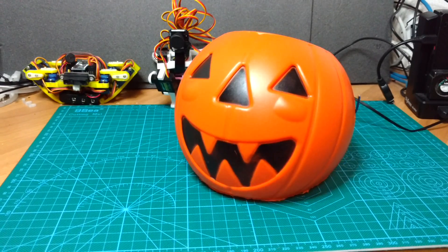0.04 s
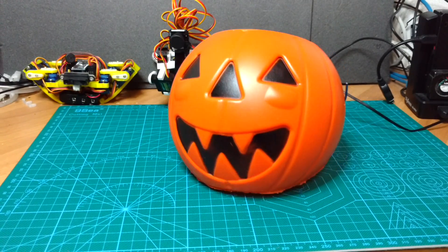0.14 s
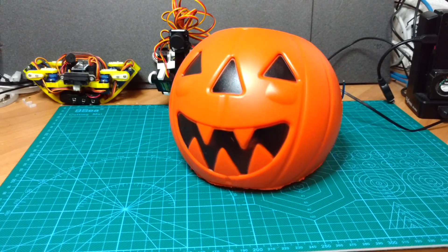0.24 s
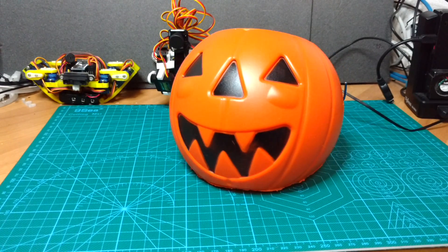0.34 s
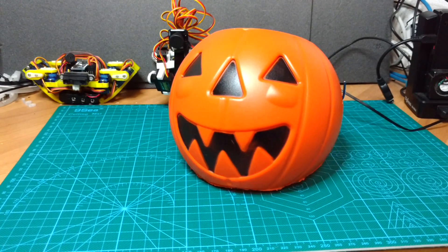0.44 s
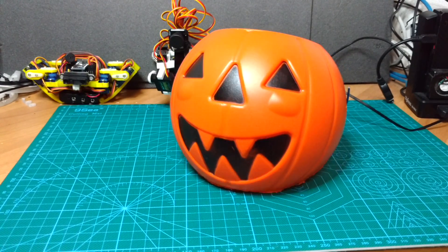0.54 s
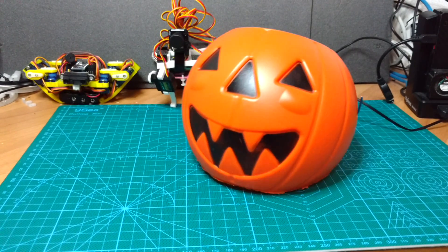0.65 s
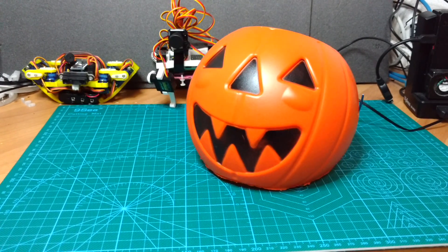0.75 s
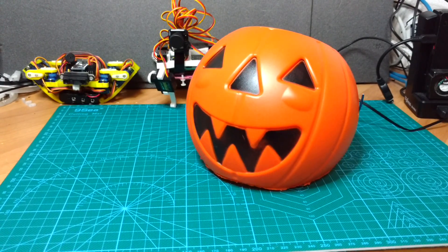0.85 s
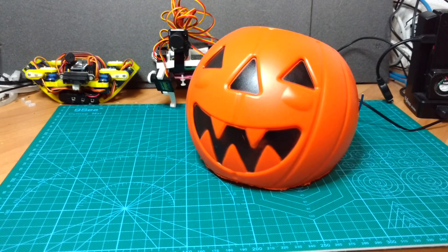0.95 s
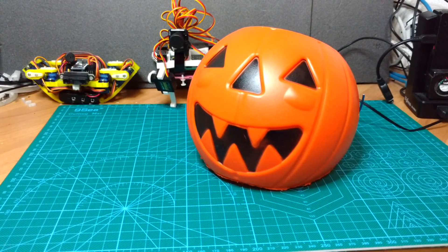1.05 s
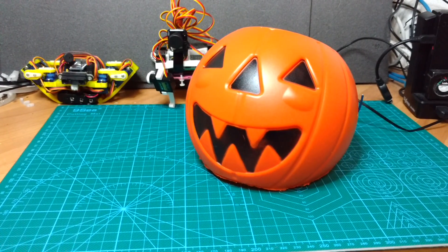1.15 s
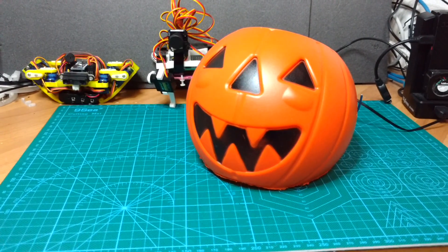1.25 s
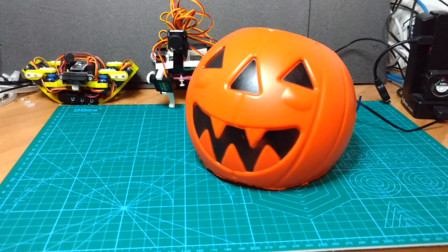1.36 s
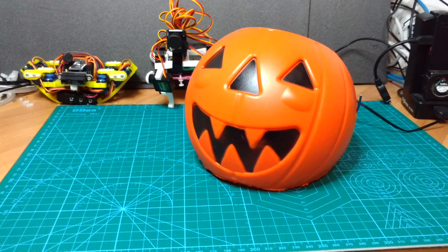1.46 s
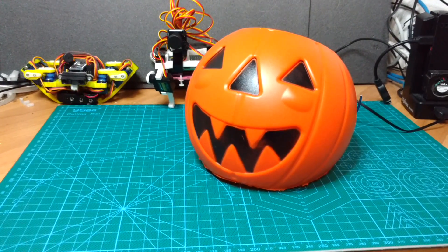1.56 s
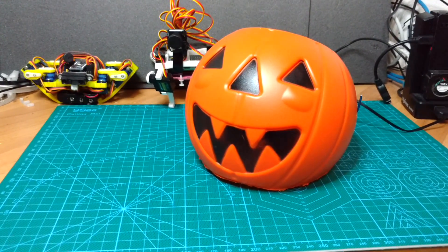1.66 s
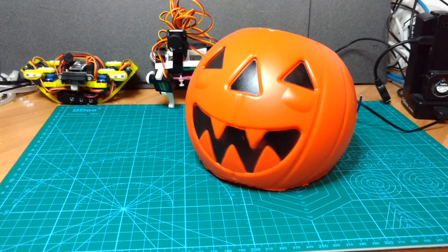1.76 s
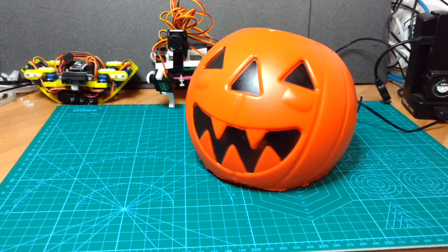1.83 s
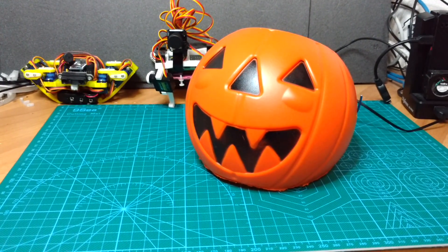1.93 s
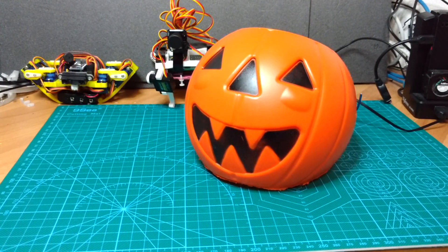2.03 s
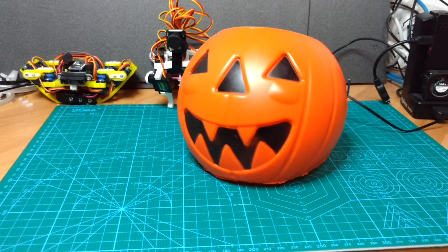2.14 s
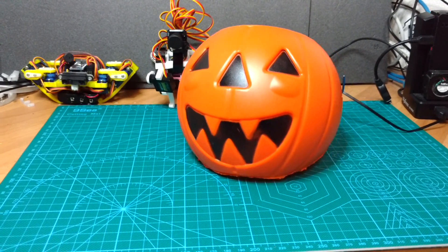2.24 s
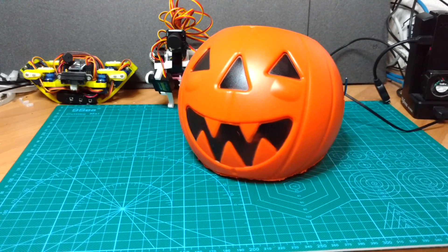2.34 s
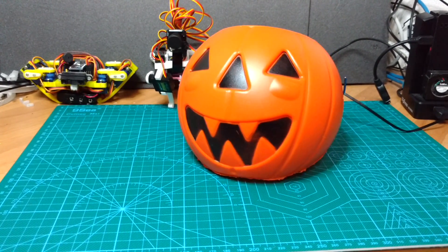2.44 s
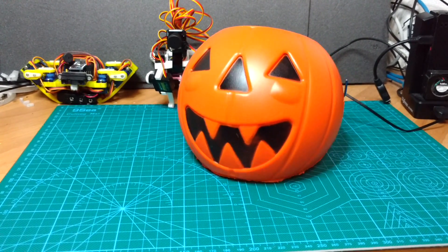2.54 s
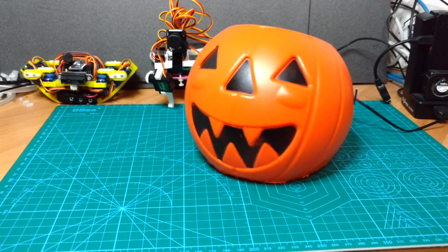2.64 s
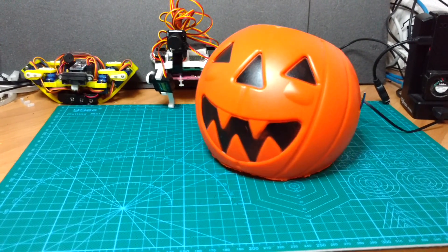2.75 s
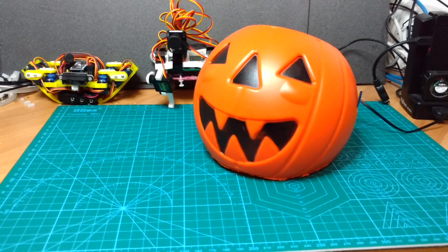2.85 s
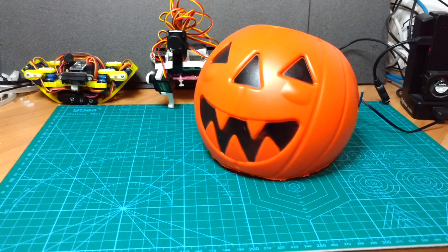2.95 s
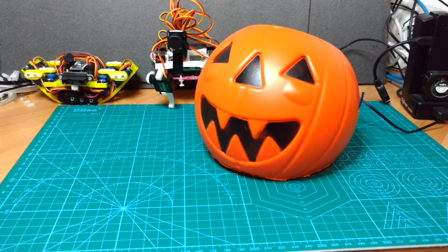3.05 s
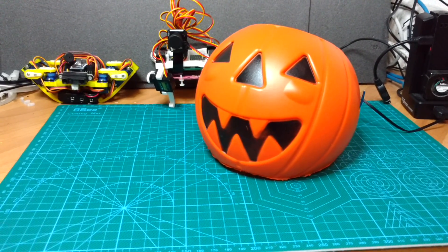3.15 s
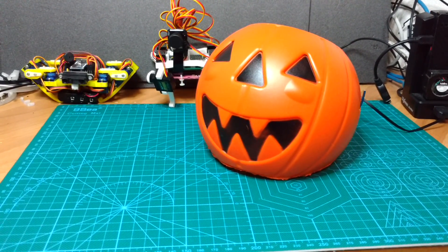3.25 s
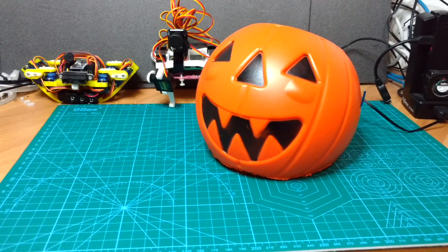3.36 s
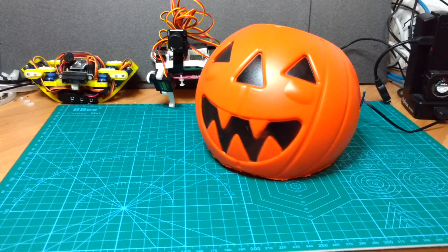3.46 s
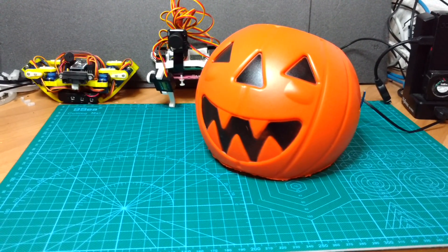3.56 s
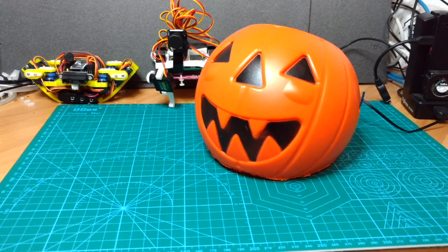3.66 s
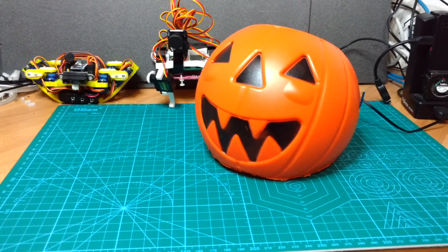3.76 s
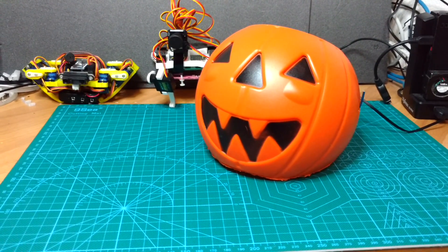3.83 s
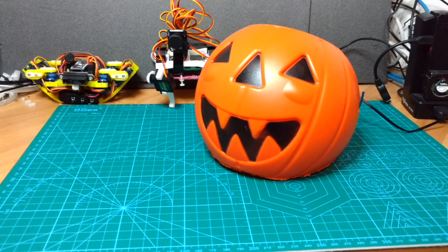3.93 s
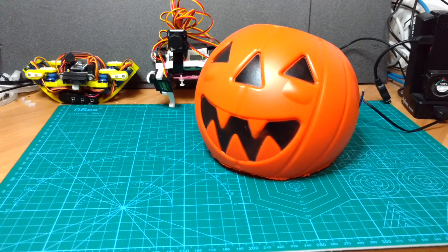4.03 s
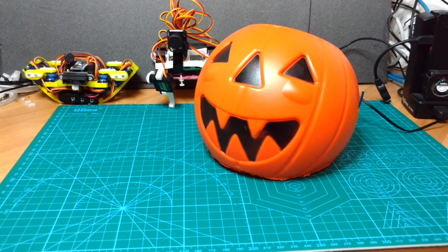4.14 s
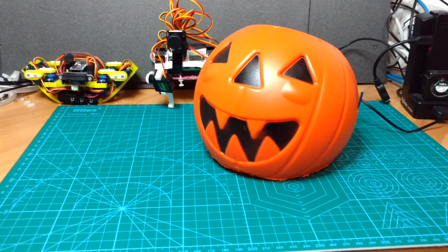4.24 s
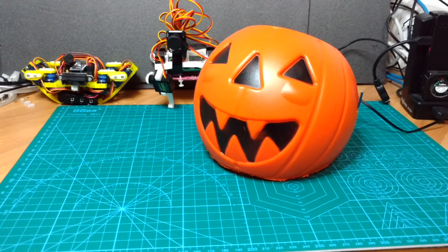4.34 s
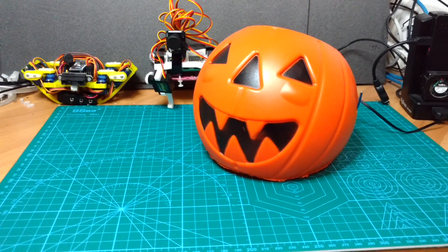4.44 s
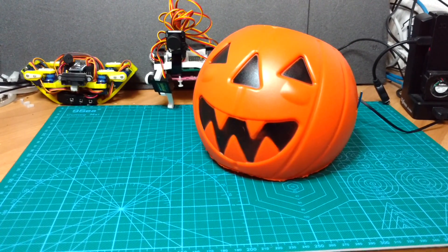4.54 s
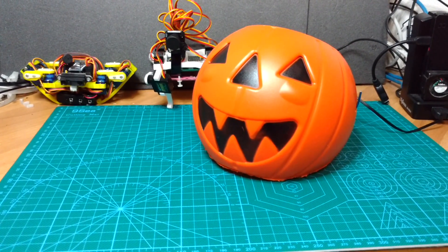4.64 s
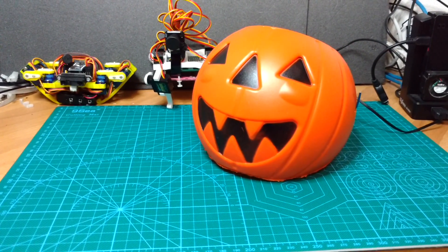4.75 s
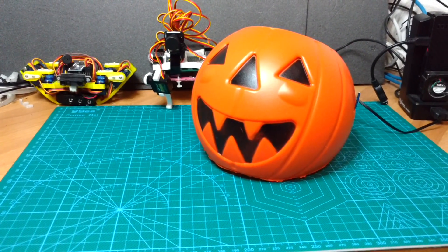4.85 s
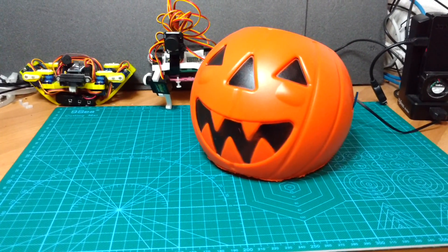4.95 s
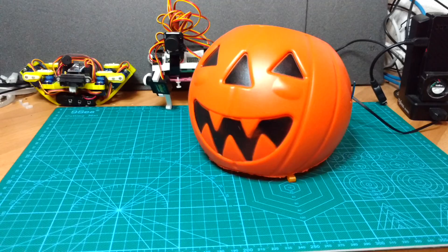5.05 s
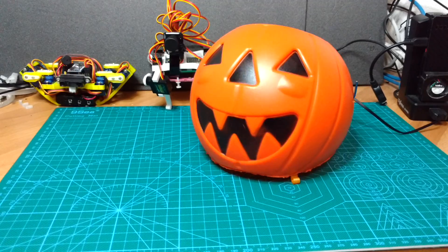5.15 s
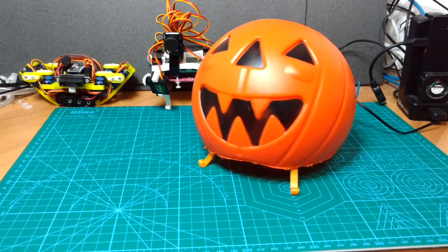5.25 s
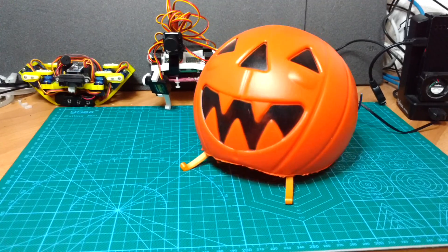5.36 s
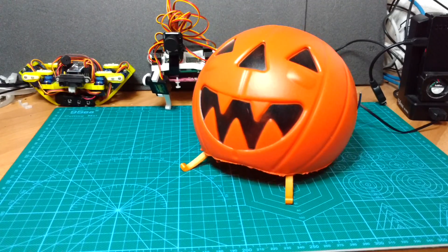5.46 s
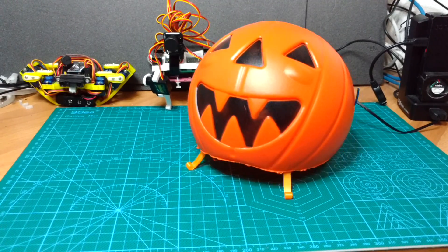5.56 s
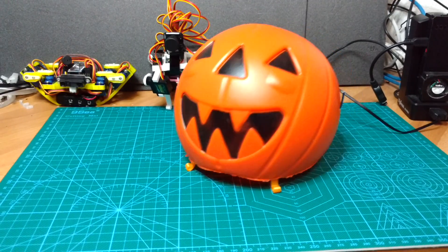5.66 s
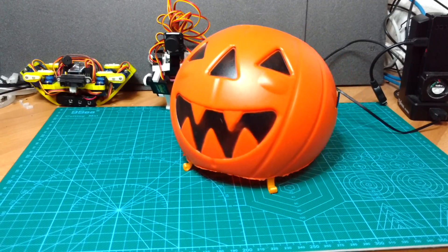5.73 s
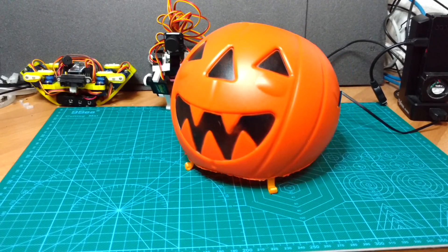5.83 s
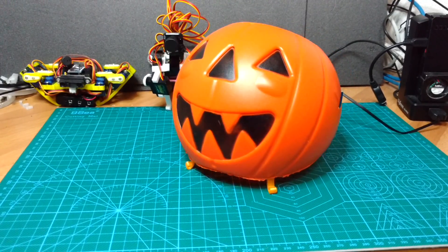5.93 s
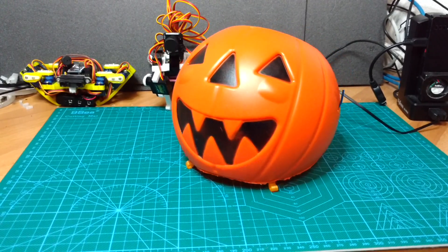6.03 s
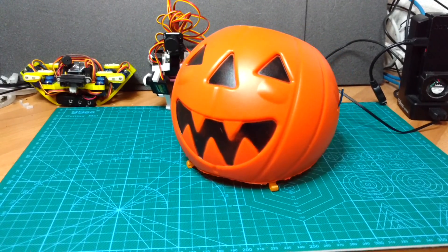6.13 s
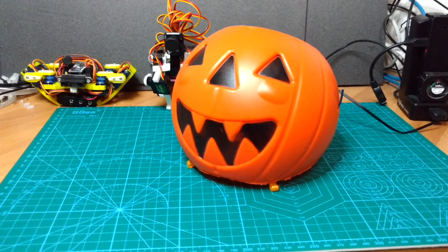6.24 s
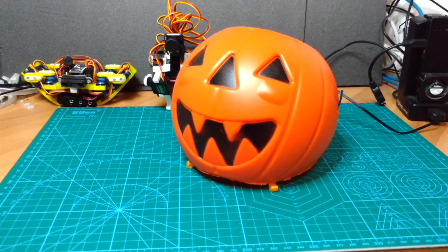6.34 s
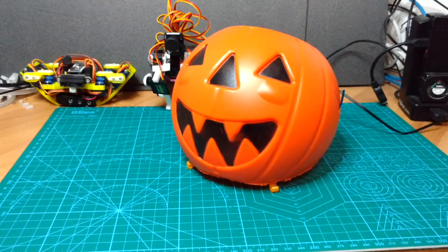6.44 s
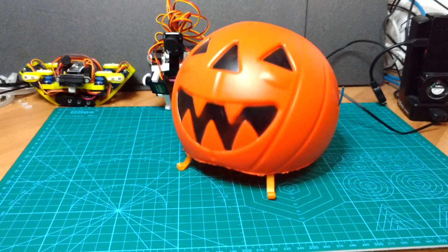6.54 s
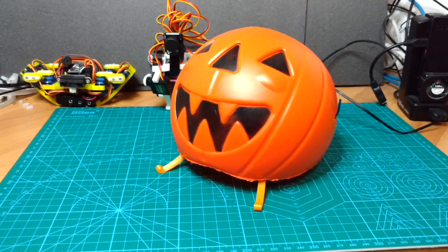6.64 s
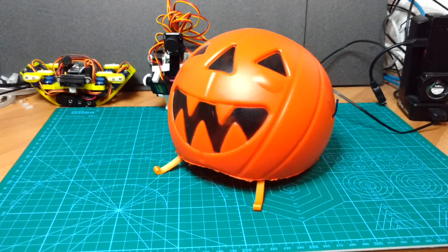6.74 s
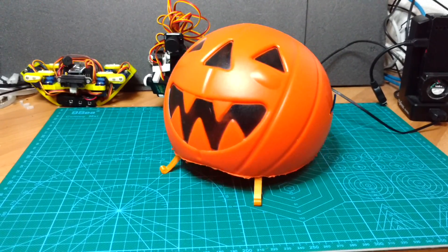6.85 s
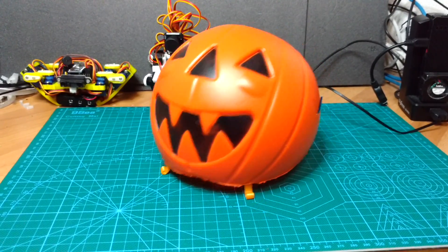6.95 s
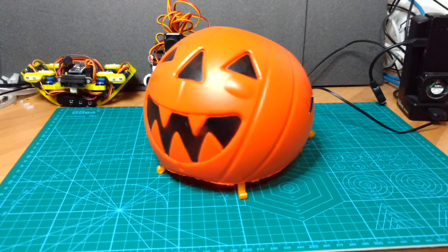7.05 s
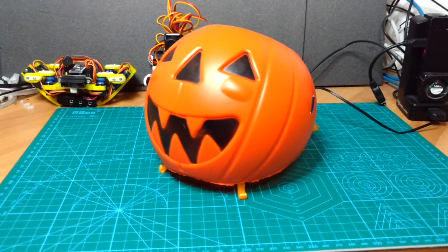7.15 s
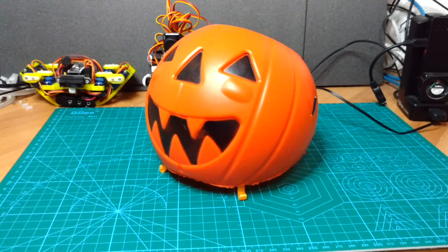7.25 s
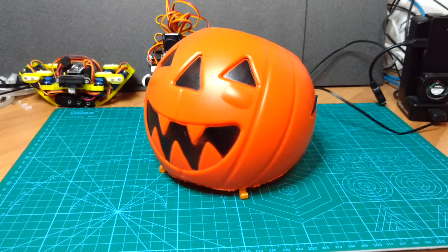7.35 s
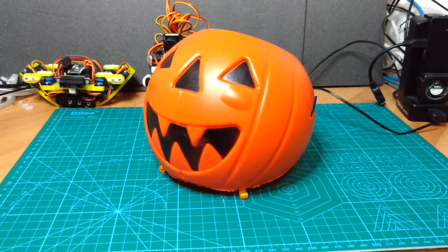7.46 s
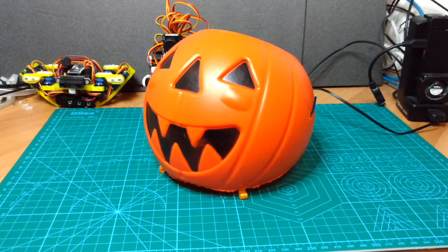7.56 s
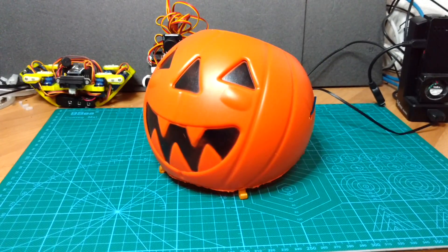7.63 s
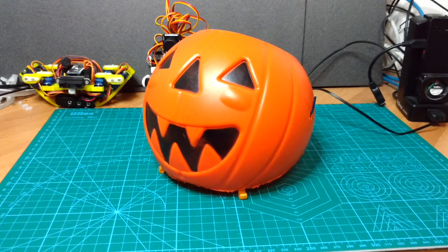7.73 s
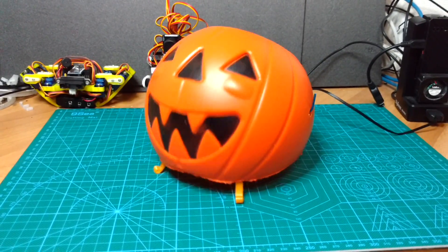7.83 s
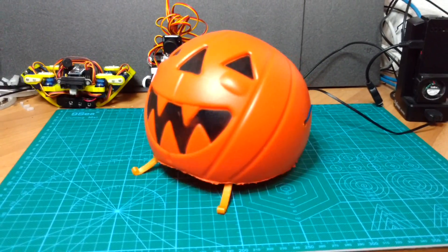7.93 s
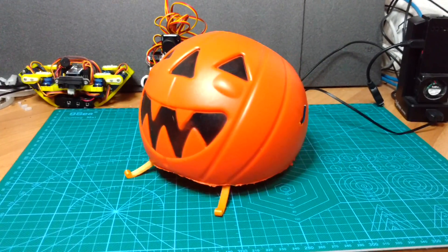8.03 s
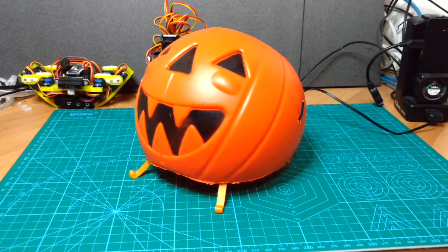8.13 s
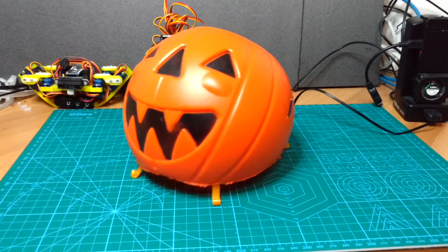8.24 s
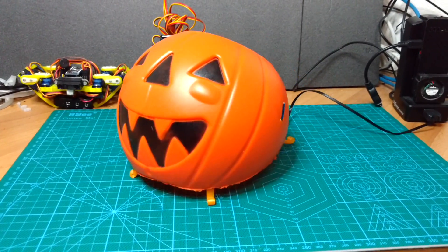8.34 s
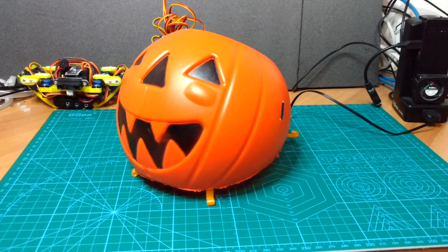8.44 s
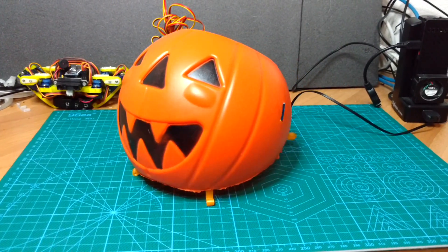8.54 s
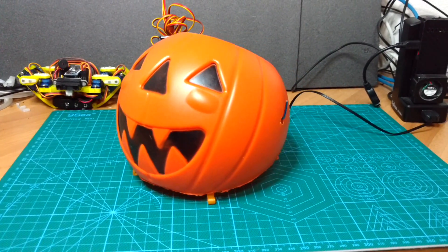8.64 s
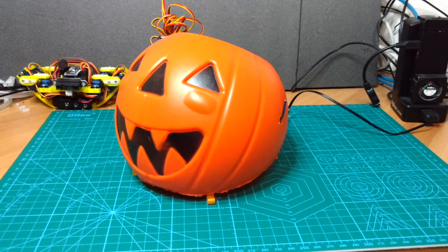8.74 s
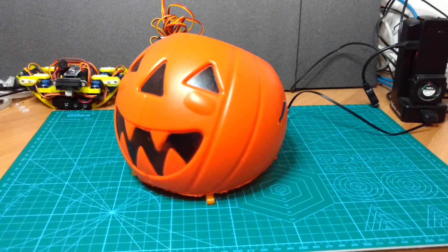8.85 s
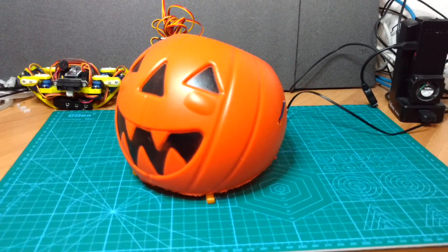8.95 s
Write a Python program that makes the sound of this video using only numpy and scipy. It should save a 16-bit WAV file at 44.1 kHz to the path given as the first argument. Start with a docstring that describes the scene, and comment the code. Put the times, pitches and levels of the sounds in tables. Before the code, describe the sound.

A small legged robot under a hollow plastic pumpkin shell whirs, knocks and squeaks in short servo bursts on a workbench.

```python
"""Small walking robot on a workbench

A four-legged robot under a hollow plastic pumpkin shell moves in bursts: servo gears whir as shaped
noise flecked with short random rings, shell and bench shake as filtered impacts, held poses buzz at 50 Hz.
Feet squeak by stick-slip and knock; shell, frame or bench resonances judder; gearboxes tick and chirp.
Two close microphone ports hear it over a faint hiss."""
import sys
import numpy as np
from scipy import signal
from scipy.fft import rfft, irfft, next_fast_len
from scipy.io import wavfile
from scipy.ndimage import uniform_filter1d

SR = 44100
rng = np.random.default_rng(int(sys.argv[2]) if len(sys.argv) > 2 else 0)


def unload_wav(signal):
    """Save mono or channel-first audio to the path in sys.argv[1] as 16-bit WAV at rate SR, clipped to [-1, 1]."""
    wavfile.write(
        sys.argv[1],
        SR,
        np.round(np.clip(np.atleast_2d(signal).T, -1, 1) * 32767).astype(np.int16),
    )


N = 396459
TIME, FREQ = np.arange(N) / SR, np.fft.rfftfreq(8192, 1 / SR)
CONTROL_HZ = 50  # servo pulse rate

# servo moves, levels relative: start_s, spin_up_s, drive_s, whir_db, change_over_drive_db,
# initial_run_down_db_per_s, rattle_db, rumble_db, growl_re_whir_db
MOVES = [(0.014, 0.037, 0.1, -30.5, 1.5, 86, -33, -36.5, -11),
         (0.493, 0.021, 0.12, -31, -3.5, 60, -35.5, -35.5, -10),
         (2.035, 0.03, 0.088, -32.5, 1.5, 59.5, -37, -39.5, -4.5),
         (2.535, 0.026, .138, -33, -1, 69, -39.5, -35.5, -4.5),
         (4.948, 0.032, .15, -35, 2.5, 175, -33.5, -42, -3),
         (5.195, 0.049, 0.24, -29, 0.5, 450, -29.5, -40.5, -1.5),
         (5.452, 0.025, 0.3, -28, 2, 249.5, -38.5, -49, -1),
         (5.8, 0.021, 0.059, -39, -1, 125, -34, -41, -3),
         (5.95, 0.014, 0.16, -34.5, 4, 310, -41, -49.5, -4.5),
         (6.5, 0.031, 0.23, -25, -8, 369, -27.5, -41.5, -2.5),
         (6.752, 0.034, 0.29, -28, 2.5, 175, -37.5, -51, 1),
         (7.13, 0.022, 0.039, -39, 1.5, 100, -34.5, -41.5, 0),
         (7.251, 0.033, .17, -32, 2, 290, -36, -45, -14),
         (7.808, 0.018, 0.21, -27, -3, 230.5, -25.5, -37.5, 1),
         (8.053, 0.02, 0.31, -28, 2, 231, -34, -47.5, -1.5),
         (8.415, 0.013, 0.036, -36.5, 0, 89.5, -32.5, -41, 2.5),
         (8.555, 0.017, 0.044, -31.5, -1, 279.5, -24.5, -43, -4),
         (8.622, 0.017, 0.1, -28.5, -3, 302, -41.5, -44, -11)]
# gear teeth snapping over as a servo corrects itself, levels relative:
# contact_s, body_db, treble_db, t60_s, leg_ring_hz, case_ring_hz
TICKS = [(1.018, -46, -46, 0.08, 1000, 6040), (1.555, -30.5, -39, 0.094, 1470, 6700),
         (1.736, -35, -43, 0.021, 1050, 3500), (1.908, -27, -48, 0.037, 974, 3150),
         (2.004, -28, -20.5, 0.024, 1020, 3900), (3.346, -36.5, -39, 0.039, 900, 3370),
         (3.383, -35.5, -42, 0.09, 850, 3540), (3.549, -31.5, -43.5, 0.091, 1510, 2870),
         (3.586, -38, -55, 0.12, 890, 3500), (3.665, -40, -49, 0.35, 980, 3900),
         (3.75, -25.5, -29.5, 0.063, 1006, 3000), (3.819, -38, -50, 0.04, 920, 3500),
         (3.834, -32, -39.5, 0.13, 780, 5930), (3.901, -32, -44, 0.06, 770, 3740),
         (3.908, -31, -46, 0.061, 825, 3670), (3.97, -38, -50, 0.23, 790, 3400),
         (4.069, -29.5, -41.5, 0.09, 1055, 3270), (4.152, -38.5, -47, 0.12, 1110, 3630),
         (4.24, -40, -51, 0.26, 1190, 3500), (4.329, -36, -44, 0.078, 895, 3560),
         (4.34, -34, -34, 0.058, 670, 3700), (4.345, -26, -32, 0.072, 1065, 2920),
         (4.866, -37, -60, 0.044, 1011, 3400), (4.903, -41, -40, 0.02, 998, 3500),
         (4.911, -33, -27, 0.042, 994, 3450), (6.256, -46.5, -33, 0.14, 984, 5980),
         (7.558, -45, -33, 0.16, 891.3, 6198), (7.58, -36.5, -50, 0.048, 800, 3480),
         (7.598, -42, -52, 0.044, 680, 3500), (8.863, -59, -32.5, 0.13, 903.4, 6503)]
# gear-train noise colour: freq_hz, density_db (per Hz)
GEARS = [(40, -31.8), (95, -17), (140, -10.1), (400, -8.2), (750, -3.2), (1500, -4.0), (2000, -5),
         (2350, -10), (2900, -1), (3500, -2.8), (4000, -1), (4600, -1.6), (5500, .3), (6200, -.3),
         (7000, -1), (8500, -3.3), (11000, -8.5), (13000, -11), (15000, -16.5)]


def amp(db):
    """Decibels to amplitude."""
    return 10 ** (np.asarray(db) / 20)


def evened(x):
    """Scale to unit RMS."""
    return x / np.sqrt(np.mean(x ** 2) + 1e-20)


def read(points, hz):
    """Interpolate a spectrum linearly on a log-frequency axis."""
    f, value = np.transpose(points)
    return np.interp(np.log(hz + 1), np.log(f + 1), value)


def add(mix, s, sound):
    """Add a sound at s seconds, clipped at the end of the mix."""
    part = mix[..., max(round(s * SR), 0):][..., :sound.shape[-1]]
    part += sound[..., :part.shape[-1]]


def wander(hz, size=N):
    """Random drift of about unit RMS, low-passed near hz."""
    n = next_fast_len(max(size, SR))
    lowpass = 1 + (np.fft.rfftfreq(n, 1 / SR) / hz) ** 4
    return evened(irfft(rfft(rng.standard_normal(n)) / lowpass, n))[:size]


def colour(x, gain):
    """Causal minimum-phase filter of unit energy, shaped by gain over FREQ."""
    log_gain = np.log(np.maximum(gain / gain.max(), 1e-5))
    circle = np.concatenate([log_gain, log_gain[-2:0:-1]])
    ring = np.fft.ifft(np.exp(np.conj(signal.hilbert(circle)))).real[:len(FREQ)]
    return signal.oaconvolve(x, ring[None] / np.linalg.norm(ring), axes=1)[:, :N]


def resonances(modes):
    """Power-summed gain of (hz, width_hz, db) modes."""
    power = 0
    for hz, width_hz, db in modes:
        detune = (FREQ ** 2 - hz ** 2) / (width_hz * (FREQ + 1))
        power = power + amp(db) ** 2 / (1 + detune ** 2)
    return np.sqrt(power)


def resonate(x, hz, width_hz):
    """One resonance of peak gain 1."""
    return signal.lfilter(*signal.iirpeak(hz, hz / width_hz, fs=SR), x)


def shell_gain(width_hz=42):
    """Hollow shell: band-limited modes on a broad skirt."""
    # shell modes: freq_hz, gain_db
    shell_modes = [(459, -2), (516, -39), (588, 7), (732, 0.5), (961, 0.5), (1033, 1.5), (1177, 3.5),
                   (1335, 7), (1378, 0), (1478, 8.5), (1636, 3), (1693, 7.5), (1866, 7), (1995, 1.5),
                   (2095, -23), (2268, -51.5)]
    # broad response between modes: freq_hz, gain_db
    skirt = [(60, -57), (250, -7), (400, -16.5), (800, 4.5), (1500, -1), (2200, -3), (3500, -37), (5000, 4),
             (12000, -38)]
    band = 1 / np.sqrt((1 + (FREQ / 2600) ** 6) * (1 + (300 / (FREQ + 1)) ** 6))
    modes = resonances([(hz, width_hz, db) for hz, db in shell_modes])
    return np.hypot(band * modes, amp(read(skirt, FREQ)))


def bench_gain():
    """Low bench modes, rolled off above and below."""
    # bench modes under the feet: freq_hz, width_hz, gain_db
    bench_modes = [(141.4, 13.6, 0.5), (189, 40, -6), (253.3, 13.3, 4), (297, 13, -5.5), (424, 240, -6)]
    roll_off = np.sqrt((1 + (FREQ / 520) ** 6) * (1 + (122 / (FREQ + 1)) ** 10))
    return resonances(bench_modes) / roll_off


def impacts(per_s, spread_db):
    """Random tiny stereo impacts of uneven size, unit RMS."""
    size = amp(spread_db * np.minimum(rng.exponential(1, N), 4)) * (rng.random(N) < per_s / SR)
    return evened(size * rng.standard_normal((2, N)))


def blows(rows, axis, soft_db, lead_s=.0005, tint=None):
    """Brief scrape, sharp contact, dying spray of bounces; axis picks the level column, tint colours."""
    out, t = np.zeros((2, N)), TIME[:SR // 5] - 1 / 50  # contact at t = 0
    for row in rows:
        contact_s, level_db, t60_s = row[0], row[axis], max(row[3], .005)
        fall = amp(soft_db - 60 * abs(t) / t60_s) + np.exp(-abs(t) / 0.00066)
        envelope = np.where(t < 0, 1.1 * np.exp(-abs(t) / lead_s), fall)
        spray = rng.standard_normal((2, len(t))) * envelope
        short_power = uniform_filter1d((spray ** 2).mean(0), size=176)
        spray = spray / np.sqrt(short_power.max())
        add(out, contact_s + t[0], amp(level_db) * (tint(spray, row) if tint else spray))
    return out


def move_level(axis, lag_s=0, arch_db=0, settle=1, slack_s=0, stall_s=0.1):
    """Spin-up after slack, arched drive, accelerating run-down; axis picks the level column."""
    power, t = np.zeros(N), TIME[:SR]
    for row in MOVES:
        start_s, rise_s, drive_s, _, change_db, fall_db_per_s = row[:6]
        done, coast_s = np.minimum(t / drive_s, 1), np.maximum(t - drive_s, 0)
        arch = arch_db * (2 * done - 1) ** 2
        fall = settle * fall_db_per_s * coast_s * (1 + coast_s / stall_s)
        db = row[axis] + change_db * done - arch - fall
        rise = np.clip((t - slack_s) / (rise_s + lag_s), 0, 1)
        add(power, start_s, (amp(np.maximum(db, -200)) * rise) ** 2)
    return np.sqrt(power)


def whir_level():
    """Gear drive level."""
    return move_level(axis=3)


def shifting(x, depth_db, patch_hz, patch_s):
    """Random patches of the spectrum swell and fade."""
    hz, t, z = signal.stft(x, SR, nperseg=512)
    field = rng.standard_normal(z.shape[:0:-1]).T
    bins, frames = max(round(patch_hz / hz[1]), 1), max(round(patch_s / t[1]), 1)
    for _ in range(2):
        field = uniform_filter1d(field, bins, axis=0)
        field = uniform_filter1d(field, frames, axis=1)
    gain = evened(amp(depth_db * evened(field)))
    return signal.istft(z * gain, SR, nperseg=512)[1][:, :N]


def hiss(level_db=-51.0, waver_db=-1.5):
    """Background hiss: coloured noise with a slight random waver."""
    # hiss colour: freq_hz, gain_db
    hiss_colour = [(25, 2), (70, 3.5), (140, 4.5), (400, 0.5), (900, -1), (1300, 1.5), (1800, -4.5),
                   (2400, 6), (3800, 1.5), (5100, -6), (6200, -8.5), (7200, -4), (8600, -14), (11000, -12),
                   (15000, -25)]
    gain = amp(read(hiss_colour, FREQ)) / np.hypot(1, (55 / (FREQ + 1)) ** 2)
    return amp(level_db + waver_db * wander(25)) * colour(rng.standard_normal((2, N)), gain)


def holding(buzz_db=-1, hum_db=0, fizz_db=-5, uneven_db=1.6):
    """Control pulses kick a stalled motor, ringing frame, bench and gear case, with scraping fizz."""
    # loaded servos holding a pose, levels relative: start_s, end_s, buzz_db, hum_db, case_ring_db
    holds = [(0.364, 0.488, -64, -65.5, -68), (0.8, 1.011, -58, -63.5, -72),
             (2.306, 2.518, -63.5, -66, -62), (2.817, 3.05, -57, -60.5, -72), (3.08, 3.094, -55, -73, -68),
             (6.147, 6.297, -58.5, -63, -74), (6.31, 6.51, -56, -75, -68), (7.45, 7.8, -65, -66, -68),
             (8.75, 8.99, -66, -66.5, -72)]
    buzz, hum, ring = (np.zeros((2, N)) for _ in range(3))
    for start_s, end_s, frame_db, bench_db, case_db in holds:
        for s in np.arange(start_s, end_s, 1 / CONTROL_HZ):
            kick = np.sqrt(SR / CONTROL_HZ) * amp(uneven_db * rng.standard_normal(1))
            add(buzz, s, amp(frame_db) * kick)
            add(hum, s, amp(bench_db) * kick)
            add(ring, s, amp(case_db) * kick)
    frame = colour(buzz, resonances([(1001, 91, 0)]) ** 2)
    bench = colour(hum, resonances([(260, 40, 0)]) ** 2)
    case = colour(ring, resonances([(3880, 240, 0)]) ** 2)
    keep = np.exp(-1 / (0.027 * SR))  # 27 ms decay
    scrape_level = signal.lfilter([np.sqrt(1 - keep ** 2)], [1, -keep], buzz)
    fizz = colour(scrape_level * rng.standard_normal((2, N)), amp(read(GEARS, FREQ)))
    return amp(buzz_db) * frame + amp(hum_db) * bench + case + amp(fizz_db) * fizz


def chirps(level_db=-6, peak_s=.003):
    """Thin tones with scraping noise, swelling and dying within milliseconds."""
    # chirps among the ticks, levels relative: start_s, level_db, pitch_hz
    chirp_rows = [(3.6763, -40, 5900), (3.8367, -50, 5930), (3.9904, -41.5, 5880), (4.163, -41, 5830)]
    out, t = np.zeros((2, N)), TIME[:SR // 25]
    swell = t / peak_s * np.exp(1 - t / peak_s)
    for start_s, db, hz in chirp_rows:
        tone = np.sin(2 * np.pi * hz * t) + .9 * rng.standard_normal((2, len(t)))
        add(out, start_s, amp(db + level_db) * tone * swell)
    return out


def tick_rings(leg_db=-13.5, case_db=-5, leg_t60_s=0.076, case_t60_s=0.021):
    """Each snap rings a plastic leg and, more briefly, the gear case."""
    out, t = np.zeros(N), TIME[:SR // 10]
    for s, body_db, treble_db, _, leg_hz, case_hz in TICKS:
        leg_level = amp(body_db + leg_db - 60 * t / leg_t60_s)
        case_level = amp(treble_db + case_db - 60 * t / case_t60_s)
        add(out, s, leg_level * np.sin(2 * np.pi * leg_hz * t))
        add(out, s, case_level * np.sin(2 * np.pi * case_hz * t))
    return out


def ticks(body_db=-7.0, snap_db=-6, split_hz=4800):
    """Gearbox snaps: low and high bands of impact noise plus leg and case rings."""
    # tick colour: freq_hz, gain_db
    tick_colour = [(300, -34), (700, 8), (1400, 3), (2200, 4), (3500, 6.5), (5000, 1.5), (6200, -4.5),
                   (8500, -7.5), (11000, -12.5), (15000, -33)]
    gain, low = amp(read(tick_colour, FREQ)), 1 / (1 + (FREQ / split_hz) ** 6)
    body = colour(blows(TICKS, axis=1, soft_db=-2.0), gain * low)
    snap = colour(blows(TICKS, axis=2, soft_db=-2), gain * (1 - low))
    return amp(body_db) * body + amp(snap_db) * snap + tick_rings()


def judders(level_db=-7.0, impulses_per_s=700, width_at_1khz_hz=85, taper=0.57):
    """Brief juddering resonances of shell, frame or bench, from dragging legs or control pulses."""
    # judders, levels relative: start_s, length_s, resonance_hz, level_db
    judder_rows = [(0.041, 0.03, 1330, -35), (0.135, 0.054, 725, -36), (0.14, 0.04, 1000, -34),
                   (0.165, 0.055, 203, -36.5), (0.555, 0.066, 593, -41), (0.612, 0.06, 1066, -39.5),
                   (0.617, 0.087, 248, -38), (0.725, 0.041, 1324, -40), (2.058, 0.043, 1014, -36),
                   (2.122, 0.034, 393, -28), (2.142, 0.04, 740, -35), (2.175, 0.045, 195, -38),
                   (2.206, 0.075, 1400, -46), (2.591, 0.053, 252, -41), (2.648, 0.082, 244, -39),
                   (2.731, 0.045, 240, -43), (5.09, 0.087, 457, -41), (5.221, 0.055, 1000, -34),
                   (5.271, 0.08, 377, -29.5), (5.375, 0.028, 1180, -30), (5.466, 0.34, 1390, -39),
                   (5.662, 0.065, 863, -26), (5.8, 0.062, 498, -36.5), (5.962, 0.083, 720, -33.5),
                   (6.016, 0.091, 262.7, -36.5), (6.11, 0.11, 255, -49), (6.519, 0.076, 1400, -27.5),
                   (6.525, 0.079, 262, -35), (6.883, 0.051, 710, -29.5), (6.965, 0.057, 873, -24.5),
                   (6.962, .11, 1483, -30), (7.32, 0.06, 257, -34), (7.359, 0.039, 1278, -32),
                   (7.861, 0.095, 1454, -26), (7.87, 0.17, 256.8, -34.5), (8.187, 0.092, 1429, -33),
                   (8.28, 0.05, 560, -30), (8.683, 0.14, 246, -43)]
    out = np.zeros((2, N))
    for start_s, length_s, hz, db in judder_rows:
        size, width_hz = round(length_s * SR), width_at_1khz_hz * np.sqrt(hz / 1000)
        noise_level = 0.33 + (rng.random(2 * size) < impulses_per_s / SR)
        noise = rng.standard_normal((2, 2 * size)) * noise_level
        ring = resonate(noise + noise.mean(0), hz, width_hz)
        ring = resonate(ring, hz, 2 * width_hz)[:, size:]  # drop the build-up
        add(out, start_s, amp(db + level_db) * evened(ring) * signal.windows.tukey(size, taper))
    return out


def squeaks(level_db=-1, second_db=-2, sag_hz_per_s=500, taper=0.62, grit_db=-15, jitter=.013, rough_db=2):
    """Stick-slip of a foot on the mat: unsteady sagging tone, octave and upper harmonics, grit each cycle."""
    # foot slips, levels relative: start_s, length_s, mid_pitch_hz, level_db, octave_db
    squeak_rows = [(0.07, 0.037, 741.6, -25, -25), (0.089, 0.028, 726, -22, -25),
                   (0.516, 0.045, 703, -29.5, -49), (2.087, 0.064, 760, -28, -34),
                   (2.101, 0.036, 710, -24.5, -29), (2.56, 0.035, 698, -31.5, -43),
                   (4.987, 0.031, 755, -21.5, -24.5), (5.013, 0.049, 766, -21, -24),
                   (5.046, 0.062, 749, -25, -39)]
    out, grit = np.zeros(N), np.zeros((2, N))
    for start_s, length_s, pitch_hz, first, second in squeak_rows:
        t = np.arange(0, length_s, 1 / SR)
        hz = pitch_hz - sag_hz_per_s * (t - length_s / 2)
        turn = 2 * np.pi * np.cumsum(hz * (1 + jitter * wander(290, size=len(t)))) / SR
        upper = np.sin(2 * turn)
        for k, db in [(3, -18), (4, -13), (5, -14), (6, -18)]:
            upper = upper + amp(db) * np.sin(k * turn)
        tone = amp(first + level_db) * np.sin(turn) + amp(second + second_db) * upper
        swell = amp(rough_db * wander(150, size=len(t))) * signal.windows.tukey(len(t), taper)
        add(out, start_s, tone * swell)
        puffs = (1 + np.cos(turn)) * rng.standard_normal((2, len(t)))
        add(grit, start_s, amp(first + grit_db) * swell * puffs)
    grit_gain = amp(read([(200, -7), (1200, 0), (4200, 4), (8000, -16)], FREQ))
    return out + colour(grit, grit_gain)


def struck_spot(spray, row, broad_db=-4, ring_db=2.0, width_hz=170):
    """The struck spot favours one region of shell modes."""
    return amp(broad_db) * spray + amp(ring_db) * resonate(spray, row[5], width_hz)


def knocks(thud_db=-6, crack_db=-5, thump_db=-8):
    """Feet and joints knock: the shell rings, the plastic cracks, the bench thumps."""
    # knocks, levels relative: contact_s, thud_db, crack_db, t60_s, thump_db, strongest_ring_hz
    knock_rows = [(0.083, -12.5, -22, 0.1, -48, 1410), (0.101, -11.5, -35, 0.11, -16.5, 710),
                  (0.222, -33, -34.5, 0.072, -28, 1400), (0.301, -31, -57, 0.12, -26, 522),
                  (0.557, -27.5, -47, 0.1, -34, 1340), (0.626, -34, -57, 0.11, -36, 1060),
                  (0.709, -38, -55, 0.14, -40, 1600), (0.732, -29, -41, 0.15, -30.5, 1280),
                  (0.765, -34, -58, 0.074, -42, 600), (0.806, -39, -58, 0.076, -48, 910),
                  (2.101, -20, -19.5, 0.12, -54, 1500), (2.127, -13, -30, 0.1, -22, 1440),
                  (2.237, -34.5, -58, 0.07, -33, 1150), (2.257, -36, -60, 0.13, -28.5, 616),
                  (2.592, -26.5, -48, 0.093, -38, 1300), (2.665, -40, -52, 0.099, -40, 1413),
                  (2.723, -28, -51, 0.13, -31, 990), (2.755, -31.5, -55, 0.34, -41, 425),
                  (3.112, -40, -61, 0.041, -39.5, 440), (4.993, -26, -20, 0.065, -45, 1470),
                  (5.031, -15, -12, 0.052, -48, 1220), (5.068, -17.5, -22, 0.056, -46, 1480),
                  (5.096, -23, -39, 0.16, -46, 886), (5.208, -54, -35, 0.27, -37.5, 993),
                  (5.24, -41, -32, 0.13, -25, 1043), (5.31, -17, -33, 0.11, -40, 1410),
                  (5.358, -14.5, -34, 0.068, -46, 850), (5.372, -18.5, -32, 0.044, -40, 1657),
                  (5.428, -28, -38, 0.05, -39, 998.6), (5.712, -9.5, -23, 0.059, -43, 1477),
                  (5.813, -20.5, -30.5, 0.059, -37, 1760), (5.985, -26, -40, 0.07, -40.5, 800),
                  (6.026, -15, -30, 0.083, -26.5, 496), (6.044, -14, -26, 0.069, -44, 1700),
                  (6.13, -36, -52, 0.07, -41, 560), (6.517, -23.5, -36, 0.11, -31, 805),
                  (6.542, -21, -26, 0.064, -33, 1228), (6.573, -32, -40, 0.057, -40, 560),
                  (6.68, -19, -41, 0.1, -24.5, 707.7), (6.907, -22, -23, 0.14, -42, 1510),
                  (6.992, -10.5, -17, 0.05, -38, 1470), (7.003, -10, -35, 0.095, -26, 1910),
                  (7.121, -19, -33, 0.1, -35, 750), (7.289, -16, -19, 0.076, -45, 1782),
                  (7.331, -18, -46.5, 0.1, -27.5, 799), (7.822, -14.5, -14, 0.049, -27, 790),
                  (7.923, -15, -40, 0.075, -39, 1631), (7.961, -8.5, -15, 0.07, -35, 1750),
                  (8.234, -12.5, -39, 0.095, -46.5, 1776), (8.301, -13.5, -21, 0.077, -30, 952),
                  (8.434, -14.5, -24.5, 0.06, -30, 1760), (8.634, -16.5, -26, 0.12, -25, 791),
                  (8.653, -18, -42, 0.092, -22.5, 1362), (8.874, -38.5, -60, 0.095, -35.5, 787)]
    plastic_points = [(500, -38), (2200, 8.5), (3400, 11.5), (4500, 0.5), (8000, -32), (15000, -48)]
    plastic = amp(read(plastic_points, FREQ))
    thud = colour(blows(knock_rows, axis=1, soft_db=2, lead_s=0.0047, tint=struck_spot), shell_gain())
    crack = colour(blows(knock_rows, axis=2, soft_db=14), plastic)
    thump = colour(blows(knock_rows, axis=4, soft_db=-11.0), bench_gain())
    return amp(thud_db) * thud + amp(crack_db) * crack + amp(thump_db) * thump


def motor_tones(shaft_hz=245, glide_db=0.5, count=2):
    """Motor-shaft harmonics 2-7, gliding at random."""
    out = np.zeros((2, N))
    for _ in range(count):
        turn = 2 * np.pi * np.cumsum(shaft_hz * amp(glide_db * wander(6))) / SR
        for k in range(2, 8):
            out += np.cos(k * turn + 2 * np.pi * rng.random((2, 1)))
    return evened(out)


def rattle(level_db=-4.0, rumble_db=-2, tone_db=-5, clump_db=2.4):
    """The loose shell chatters and sings with the motors; the legs shake the bench."""
    source = impacts(per_s=2000, spread_db=1.3) + amp(tone_db) * motor_tones()
    chatter = evened(source * amp(clump_db * wander(76)))
    shell_level = move_level(axis=6, lag_s=0.022, arch_db=8.5, settle=0.7, slack_s=0.011, stall_s=0.4)
    shell = amp(level_db) * colour(chatter * shell_level, shell_gain())
    shaking = move_level(axis=7, lag_s=0.065, arch_db=4.5, settle=0.9, slack_s=0.0088, stall_s=0.82)
    rumble = colour(impacts(per_s=4000, spread_db=-2.0) * shaking, bench_gain())
    return shifting(shell, depth_db=3.2, patch_hz=200, patch_s=.04) + amp(rumble_db) * rumble


def short_rings(per_s=14, spread_db=1.5, level_db=-9, t60_s=.07, rise_s=.0006):
    """Short random rings at 44 pitches, per_s each, under the whir level."""
    out, t = np.zeros((2, N)), TIME[:SR // 12]
    for hz in np.geomspace(600, 11000, 44) * rng.uniform(.97, 1.03, 44):
        ring = np.sin(2 * np.pi * hz * t) * amp(-60 * t / t60_s) * -np.expm1(-t / rise_s)
        for when, size, side in rng.random((int(per_s * TIME[-1]), 3)):
            size_db = spread_db * min(-np.log(size + 1e-9), 3)
            gain = amp(read(GEARS, hz) + size_db) * np.sqrt(hz)
            pan = np.array([[np.cos(np.pi * side)], [np.sin(np.pi * side)]])
            add(out, when * TIME[-1], gain * ring * pan)
    return amp(level_db) * evened(out) * whir_level()


def growling(x, growl_hz=3800):
    """The load of each move sets the level of gear noise below growl_hz."""
    moves = np.array(MOVES)
    now = np.maximum(np.searchsorted(moves[:, 0], TIME) - 1, 0)
    low = signal.sosfiltfilt(signal.butter(2, growl_hz, fs=SR, output="sos"), x)
    return x + low * (uniform_filter1d(amp(moves[now, -1]), size=400) - 1)


def gears(level_db=3.5, mesh_db=-1, full_speed_hz=290, speed_db=0.13, load_db=3, case_db=2.2,
          stutter_db=2.2, throb_db=1.4, grind_db=2.3):
    """Four servos share each move: teeth clatter, mesh and stutter as they slow; each case has its colour."""
    drive = whir_level()
    speed = uniform_filter1d((drive / drive.max()) ** .12, size=2500)
    slow = 1 - np.minimum(drive / (.4 * drive.max()), 1)
    drive = drive * amp(stutter_db * slow * wander(70))
    gain = amp(read(GEARS, FREQ) - 5 / (1 + (FREQ / 1800) ** 4))
    out, shares = np.zeros((2, N)), amp(load_db * np.array([wander(6.3) for _ in range(4)]))
    for share in shares / np.linalg.norm(shares, axis=0):
        turns = np.cumsum(full_speed_hz * speed * amp(speed_db * wander(4))) / SR
        wear = rng.standard_normal((2, 192))  # the same uneven teeth recur every turn
        mesh = wear[:, (turns % 1 * wear.shape[1]).astype(int)]
        teeth = impacts(per_s=1600, spread_db=-1.5) + amp(mesh_db) * mesh
        pulse = np.sin(2 * np.pi * (CONTROL_HZ * TIME + rng.random()))
        throb = amp(throb_db * pulse + grind_db * wander(130))
        case = evened(uniform_filter1d(rng.standard_normal(len(FREQ)), size=30))
        out += colour(evened(teeth * throb) * drive * share, gain * amp(case_db * case))
    return amp(level_db) * shifting(growling(out), depth_db=2.6, patch_hz=450, patch_s=.03)


def room(x, t60_s=0.15, wet_db=-12):
    """Short, sparse reflections from bench and walls."""
    t = TIME[:SR // 2]
    hits = (rng.random((2, len(t))) < 3000 / SR) * (t > .003)
    taps = rng.standard_normal((2, len(t))) * hits * amp(-60 * t / t60_s)
    wet = signal.fftconvolve(x, taps / np.linalg.norm(taps[0]), axes=1)[:, :N]
    return x + amp(wet_db) * wet


def placed(x, left_db):
    """Level difference, left over right."""
    return x * evened(amp(np.array([[left_db], [-left_db]]) / 2))


def microphone(ports, spread, null, port_delay_s=.0003995):
    """Each channel is one port minus the delayed other, with widened nulls, levelled again."""
    # share of the other port subtracted: freq_hz, share (0-1)
    cancel = [(3900, 1), (5000, .46), (7500, .47), (10000, .8), (12500, .42), (15000, .45)]
    hz, (a, b) = np.fft.rfftfreq(N, 1 / SR), rfft(ports)
    other = np.clip(read(cancel, hz), 0, .995) * np.exp(-2j * np.pi * hz * port_delay_s)
    # above the bass, width sets how broad the sum and difference dips are
    width = null / (1 + (600 / (hz + 1)) ** 4)
    to_mid, to_side = (g / np.sqrt(1 + (width / abs(g)) ** 6) for g in (1 - other, 1 + other))
    to_side = to_side * amp(read(spread, hz))
    level = np.sqrt(2 * (abs(to_mid) ** 2 + abs(to_side) ** 2))
    mid, side = (a + b) * to_mid / level, (a - b) * to_side / level
    return irfft(np.array([mid + side, mid - side]), N)


def scene():
    """Robot stronger at the right port, hiss at the left."""
    # port unlikeness for the robot: freq_hz, difference_re_sum_db
    robot_spread = [(30, -22), (150, -20), (400, -11), (750, -4), (1700, 0), (15000, 0)]
    # port unlikeness for the hiss: freq_hz, difference_re_sum_db
    hiss_spread = [(30, -16), (200, -5), (700, 0), (15000, 0)]
    reflected = room(gears() + short_rings() + rattle() + judders() + knocks() + ticks() + chirps())
    robot = placed(reflected + squeaks() + holding(), left_db=-2.0)
    background = placed(hiss(), left_db=3.5)
    return microphone(robot, robot_spread, null=.58) + microphone(background, hiss_spread, null=.38)


def record(dry):
    """Band limit of the recorder."""
    lowpass = signal.firwin(401, 15600, window=("kaiser", 9), fs=SR)  # edge in Hz
    return signal.oaconvolve(dry, lowpass[None], "same")


dry = scene()
out = record(dry)
unload_wav(out)
```